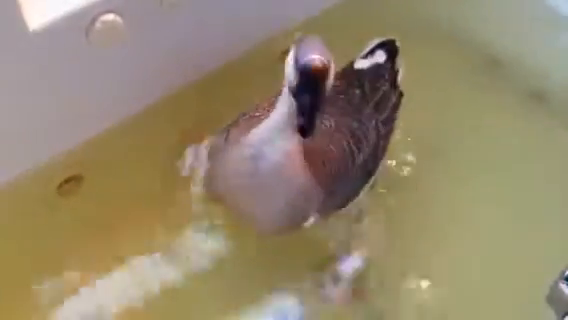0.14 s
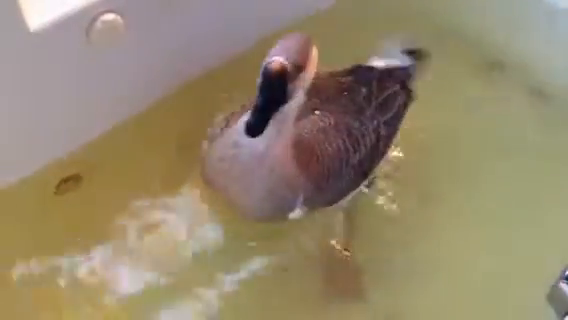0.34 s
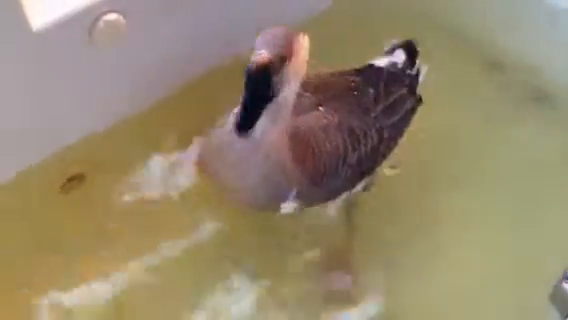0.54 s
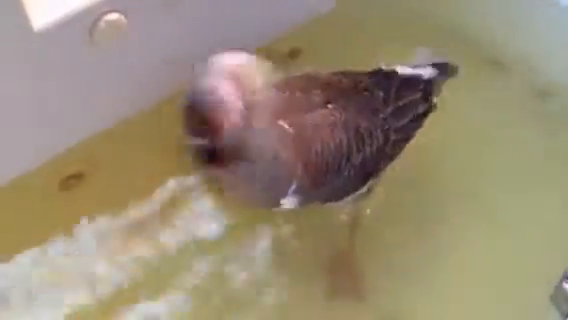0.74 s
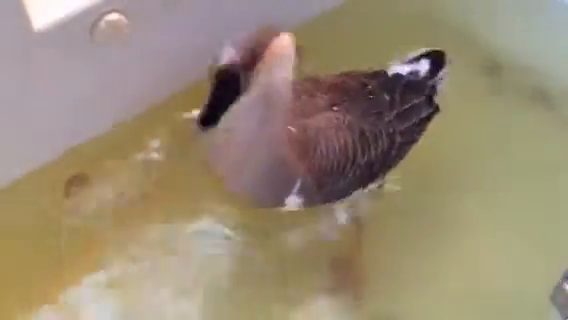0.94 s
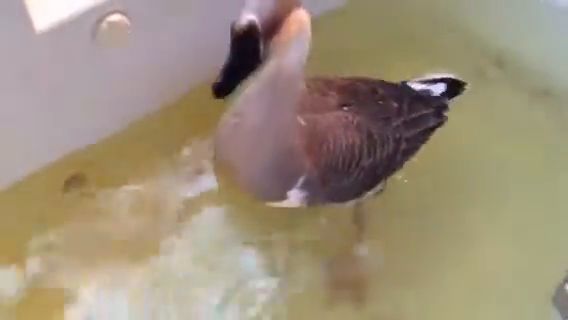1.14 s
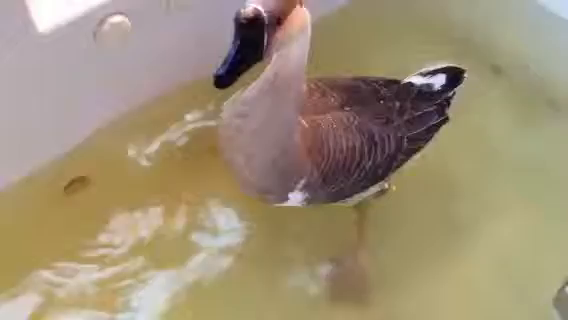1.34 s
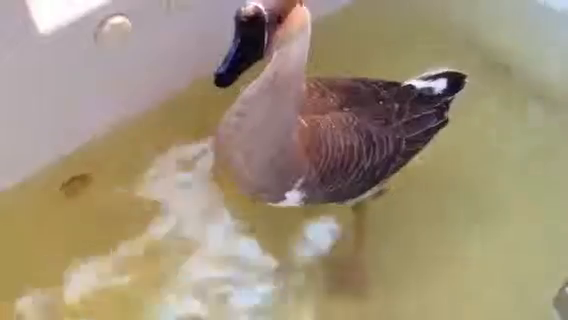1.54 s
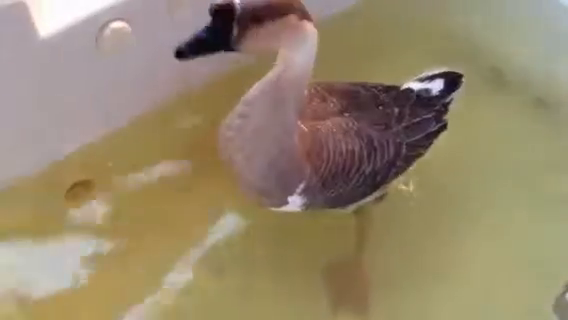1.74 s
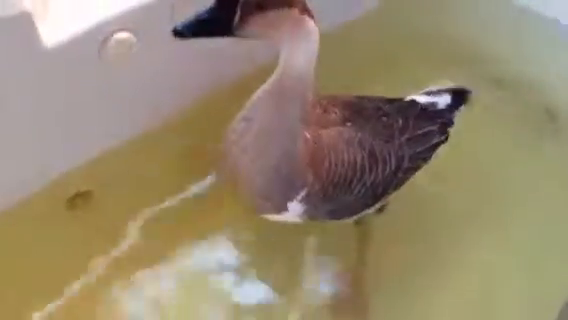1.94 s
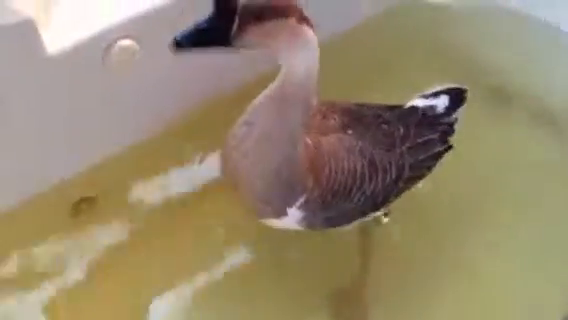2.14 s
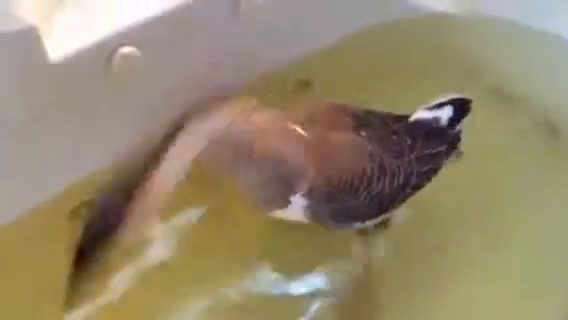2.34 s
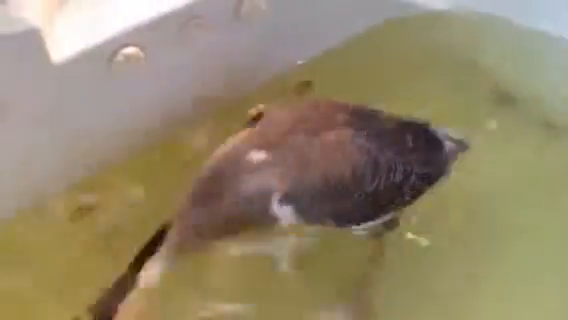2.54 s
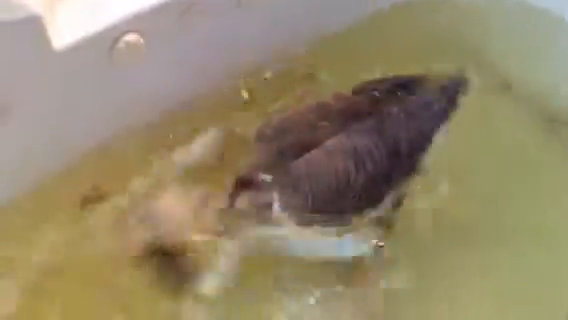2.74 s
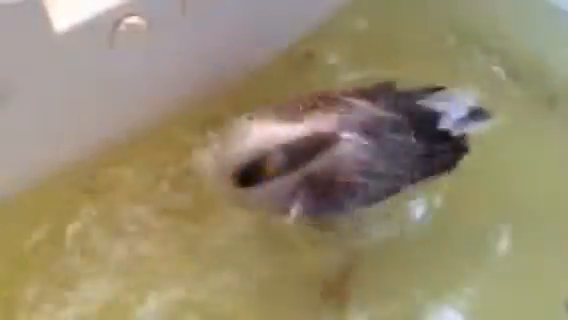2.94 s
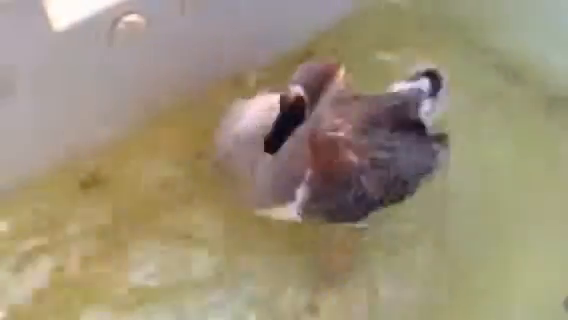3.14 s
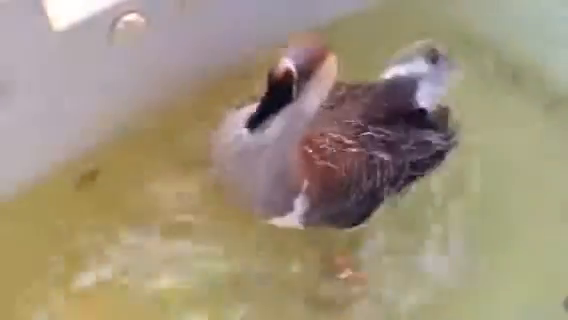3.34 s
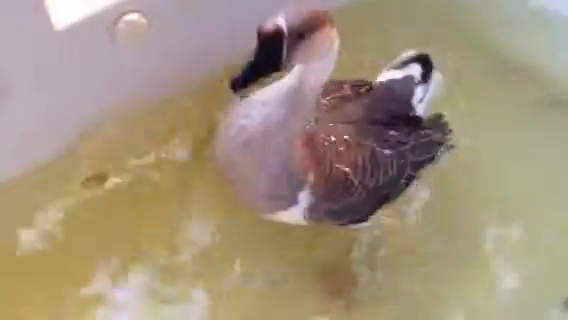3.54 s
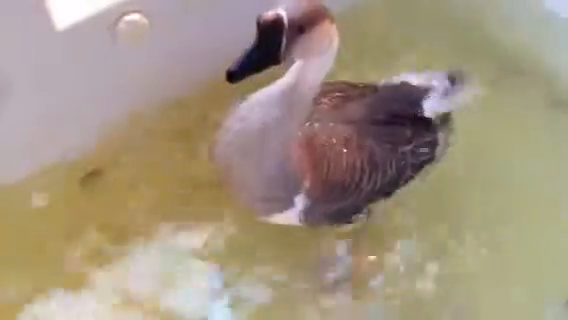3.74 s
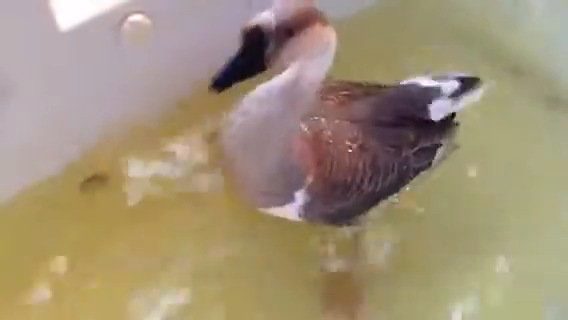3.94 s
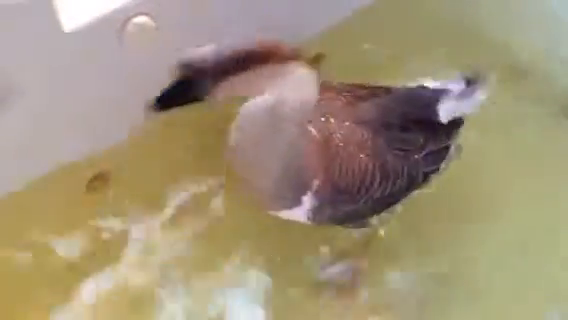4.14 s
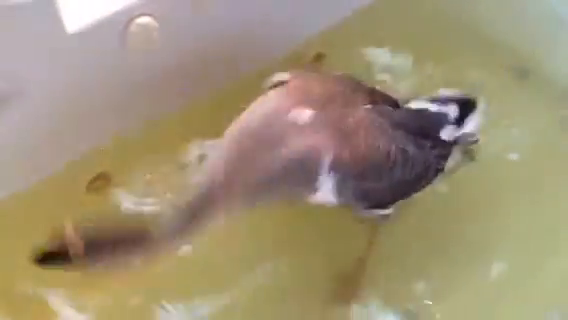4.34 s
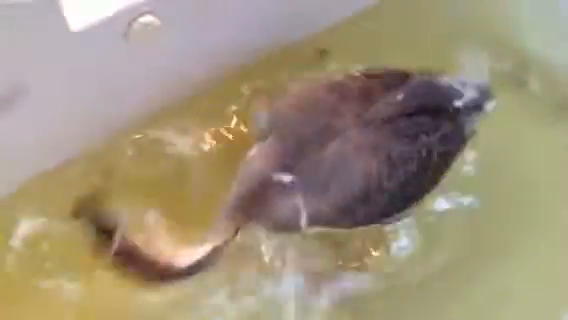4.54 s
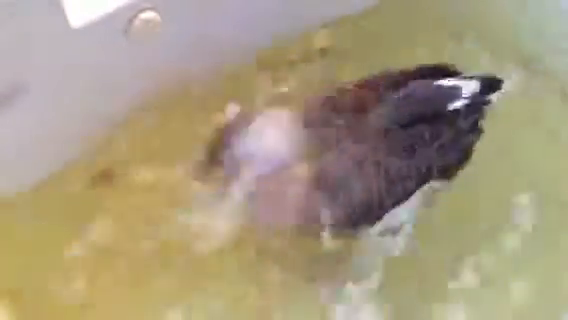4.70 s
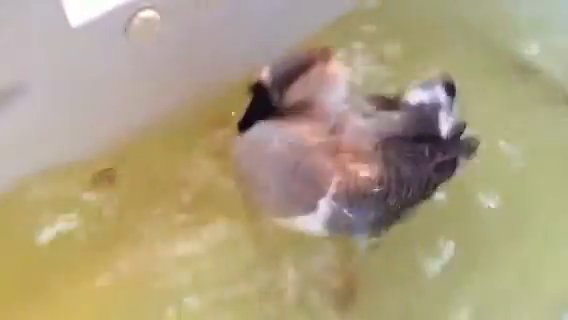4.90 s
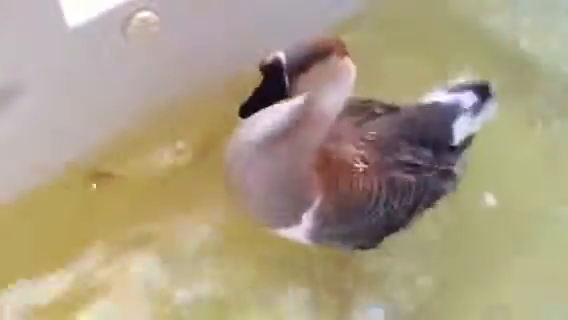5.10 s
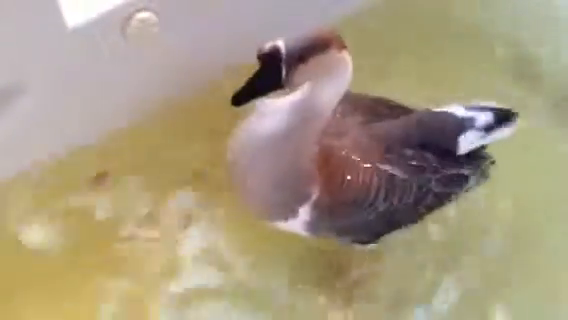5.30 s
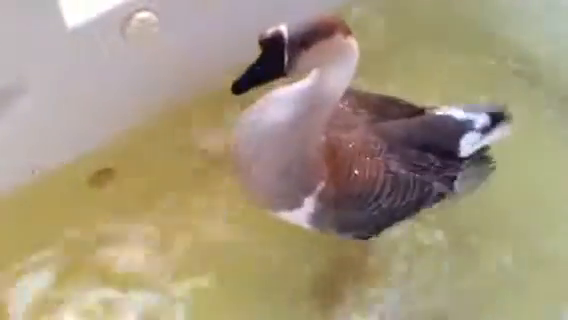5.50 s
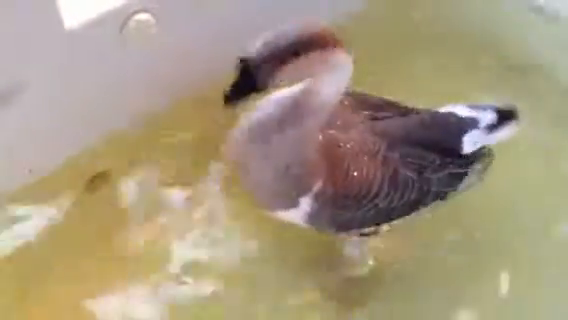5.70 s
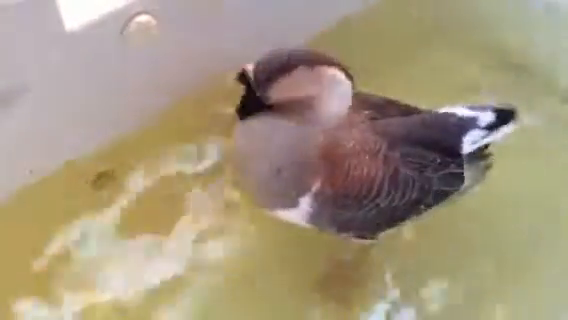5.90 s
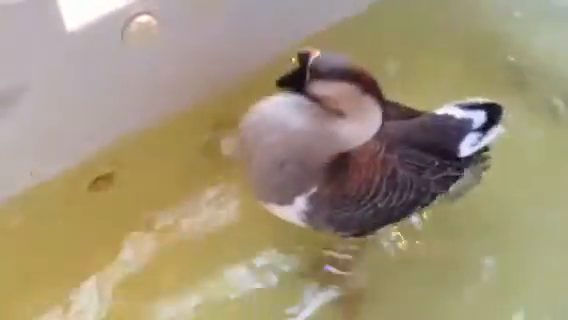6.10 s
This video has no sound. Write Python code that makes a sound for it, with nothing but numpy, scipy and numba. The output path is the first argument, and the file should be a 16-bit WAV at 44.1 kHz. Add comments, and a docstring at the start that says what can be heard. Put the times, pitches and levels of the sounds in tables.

```python
"""A goose bathes in a bathtub, heard from a phone held above it. First come a faint airy whistle, a light
stir of the water and, at 0.9 s, a shake of the head that flings spray. After more whistles near 2 s the
neck dips at 2.5 s and again at 4.4 s, each time churning up bubbles that ring as tiny resonators: swarms
fizz, large bubbles plop and glide, slaps knock the tub. The last drops tick on the water at 6 s.
Throughout, tub and tiles reverberate briefly over the hush of the room and the hiss of the microphone."""
import sys
import numpy as np
from scipy import signal
from scipy.fft import rfft, irfft
from scipy.io import wavfile
from numba import njit

SR = 44100
rng = np.random.default_rng(int(sys.argv[2]) if len(sys.argv) > 2 else 0)


def int16_out(signal):
    """Quantize to a 16-bit WAV file."""
    q = np.round(np.clip(np.atleast_2d(signal).T, -1, 1) * 32767)
    wavfile.write(sys.argv[1], SR, q.astype(np.int16))


N = 276066


def churn():
    """Air entrainment: the harder the bird stirs, the louder the swarms of resonating bubbles."""
    # spells of movement, one curve each: (t/s, fizz level/dB)
    spells = [
        [(0.4, -65), (0.48, -61), (0.56, -65), (0.7, -72.5), (0.79, -61.5), (0.97, -66.5), (1.08, -77)],
        [(2.073, -58.5), (2.15, -73), (2.4, -83)],
        [(2.485, -42.5), (2.59, -47.5), (2.64, -60), (2.665, -36), (2.81, -33.5), (2.835, -30.5), (2.92, -23.5),
         (2.96, -36), (3.09, -28.5), (3.17, -35), (3.29, -34), (3.36, -52.5), (3.47, -55), (3.7, -67)],
        [(4.33, -56.5), (4.43, -64.5), (4.45, -48), (4.6, -54.5), (4.64, -34.5), (4.79, -28.5), (4.835, -37.5),
         (4.87, -32), (5.0, -31.5), (5.08, -33.5), (5.13, -40.5), (5.28, -50.5), (5.5, -64), (5.54, -56.5),
         (5.62, -72.5), (5.8, -69)],
    ]
    # bill or neck drags air under: (t/s, gurgle level/dB)
    plunges = [(.5, -57), (.88, -48.5), (2.492, -26.5), (2.84, -22.5), (4.45, -35)]
    t, silent_db = np.arange(N) / SR, -150.
    fizz_db = np.full(N, silent_db)
    for spell in spells:
        times, db = np.transpose(spell)
        moving = (t >= times[0]) & (t <= times[-1])
        fizz_db[moving] = np.interp(t[moving], times, db)
    stir_db = fizz_db + 30  # 0 dB at full stir
    burst = lambda start, db, db_per_s: np.where(t >= start, db - db_per_s * (t - start), silent_db)
    plunges_db = [burst(start, db, db_per_s=207) for start, db in plunges]
    head_shake_db = burst(start=.889, db=-46, db_per_s=130)
    gurgle_db = np.max([-37 + 1.6 * stir_db] + plunges_db, axis=0)
    spray_db = np.maximum(-35 + .82 * stir_db, head_shake_db)
    spatter_db = flutter_db(per_s=30, spread_db=3.42)  # the water breaks unevenly
    fizz = swarm(fizz_db + spatter_db - 1, per_s=2206, band_hz=(988.5, 4304), cycles=13)
    gurgle = swarm(gurgle_db - 4, per_s=327, band_hz=(230.5, 1306.5), cycles=9.5, scatter_db=-3)
    spray = swarm(spray_db + spatter_db + 1.5, per_s=3001.5, band_hz=(3595.5, 13500), cycles=4,
                  scatter_db=3, db_per_octave=-4)
    trickle = swarm(-48 + .63 * stir_db, per_s=40, band_hz=(1303, 6997), cycles=34)
    return fizz + gurgle + spray + trickle


def swarm(db, per_s, band_hz, cycles, scatter_db=2.5, db_per_octave=5):
    """Incoherent sum: random bubbles add in power; each rises in pitch as it nears the surface."""
    when, pitch, strength, ringing = rng.random((int(per_s * N / SR), 4)).T
    t = when * N / SR
    low_hz, high_hz = band_hz
    hz = low_hz * (high_hz / low_hz) ** pitch
    t60 = cycles * (.5 + 2 * ringing) / hz
    scatter = -np.log(1 - strength + strength / 200)  # truncated exponential distribution
    size = undb(db_per_octave * np.log2(hz / low_hz) + scatter_db * scatter)
    expected_rms = np.sqrt(per_s * np.mean(size ** 2 * t60) / (4 * np.log(1000)))
    envelope = undb(np.interp(t, np.arange(N) / SR, db))
    return resonances(t, hz, t60, size * envelope / expected_rms, glide=.27 / t60)


def large_bubbles():
    """Bubble resonance: each is born in a splash, beats with a neighbour and flutters under ripples."""
    # bubbles that stand out: (t/s, level/dB, f/Hz, t60/s, glide/(octaves/s))
    plops = [(0.49, -41, 520, 0.066, -0.5), (0.65, -40.5, 328, 0.052, -2), (0.757, -30.5, 253, 0.028, 1),
             (2.505, -17, 453, 0.016, 4), (2.682, -41.5, 544, 0.23, 3.5), (2.744, -37, 1103, 0.13, -11),
             (2.835, -23.5, 2076, 0.071, -7.5), (2.862, -24, 2660, 0.045, 0), (2.903, -19, 917, 0.027, 7),
             (2.921, -30.5, 2340, 0.16, -4.5), (2.976, -25.5, 1525, 0.057, 0),
             (3.095, -18.5, 754, 0.023, 4.5), (3.096, -22, 1420, 0.024, -4), (3.234, -22, 1334, 0.034, -10),
             (3.305, -35.5, 1842, 0.15, 3), (3.307, -32.5, 989, 0.082, -3.5), (3.476, -31, 2114, 0.044, -3),
             (3.377, -45.5, 2510, 0.085, -2), (3.505, -26, 2890, 0.012, 5), (3.792, -40, 1563, 0.09, 0.5),
             (4.333, -48, 1630, 0.21, 30), (4.375, -35.5, 2554, 0.04, 12),
             (4.403, -45.5, 309.5, 0.48, 14.5), (4.44, -19, 320, 0.032, 2), (4.614, -33, 2450, 0.21, 5.5),
             (4.628, -21, 1163, 0.064, 8.5), (4.675, -24, 1924, 0.12, 8), (4.676, -23, 1240, 0.056, 19),
             (4.695, -19, 834, 0.021, -10.5), (4.86, -39, 640, 0.43, -6), (4.972, -32, 1240, 0.051, -1),
             (4.966, -33, 486.3, 0.26, 5), (5.003, -23.5, 555, 0.073, -0.5), (5.048, -27, 633, 0.1, 13),
             (5.1, -24.5, 618, 0.1, 6), (5.106, -25, 890, 0.091, 4.5), (5.115, -22.5, 1976, 0.036, 11),
             (5.311, -49, 760, 0.077, 4.5), (5.328, -41.5, 2070, 0.032, -6.5), (5.378, -43, 1540, 0.07, -2),
             (5.563, -48.5, 1590, 0.046, 1)]
    t, db, hz, t60, glide = np.transpose(plops)
    detune, lag = rng.uniform(-1, 1, (len(t), 2)).T
    tone = resonances(t, hz, t60, undb(db), glide)
    neighbour = resonances(t + .012 * abs(lag), hz * (1 + .1 * detune), t60, undb(db - 5), glide / 2)
    ripples = undb(flutter_db(per_s=70, spread_db=2.5))
    return (tone + neighbour) * ripples + splash(t, db - 7.5, hz, snap_db=-20, octaves=.5, count=30)


def slaps():
    """Impact excitation: a slap froths over many bubble sizes and rings the modes of tub and water."""
    # slaps of bill, neck or flung water: (t/s, level/dB, centre f/Hz, relative knock level/dB)
    impacts = [(0.4892, -33.5, 2900, -14.5), (0.612, -37.5, 2410, 0.5), (0.8019, -37.5, 5140, -28),
               (0.887, -32, 8640, -33), (0.9308, -33, 4460, -31), (1.024, -45.5, 2850, -29),
               (1.4447, -46.5, 1670, -19), (2.4884, -23, 1930, -8.5), (2.56, -40, 6500, -21),
               (2.596, -29, 5530, -20), (2.833, -25.5, 1880, -24), (3.7892, -39.5, 2670, -43),
               (3.9992, -47, 2780, -20), (4.4396, -17.5, 2670, -18), (4.362, -41.5, 1300, -20),
               (4.6173, -46, 2570, -25), (4.675, -34, 1910, -7), (4.9878, -17, 2370, -31),
               (5.418, -38.5, 4550, -31), (5.536, -39.5, 2180, -19)]
    # modes of tub and water: (f/Hz, level re knock/dB, t60/s)
    modes = [(141, 7, 0.04), (1124, -7.5, 0.019)]
    t, db, hz, knock_db = np.transpose(impacts)
    knock = sum(resonances(t, f, t60, undb(db + knock_db + mode_db)) for f, mode_db, t60 in modes)
    return knock + splash(t, db, hz, snap_db=-14, octaves=.856)


def drops():
    """Drop impact: each traps a tiny bubble that rings for 39 cycles, with a splash near its pitch."""
    # drops on the surface: (t/s, level/dB, f/Hz)
    drips = [(0.4804, -36.5, 3550), (0.5854, -44, 5000), (0.615, -36.5, 2880), (0.738, -51.5, 2670),
             (2.0752, -38, 3900), (2.084, -41, 4080), (2.59, -35, 3200), (2.6895, -18.5, 3470),
             (2.912, -20, 3500), (2.924, -19, 8400), (3.15, -28.5, 8500), (3.601, -49, 4800),
             (3.7496, -33, 4820), (3.8216, -39.5, 3160), (4.298, -53, 3430), (4.5198, -28, 4700),
             (4.576, -32, 4720), (4.6463, -19, 4230), (4.7534, -25, 3600), (4.7786, -21, 2400),
             (4.8599, -17.5, 5050), (4.907, -24.5, 7700), (4.957, -25.5, 3600), (5.0383, -21.5, 4340),
             (5.144, -29.5, 2850), (5.225, -49, 3400), (5.273, -42, 3150), (5.3107, -31, 7000),
             (5.374, -41, 3500), (5.4594, -42.5, 5850), (5.4992, -42.5, 4270), (5.6174, -42, 11600),
             (5.6365, -45, 4530), (5.7221, -46.5, 6200), (6.0047, -36.5, 3400), (6.0405, -32.5, 3650)]
    t, db, hz = np.transpose(drips)
    return resonances(t, hz, 39 / hz, undb(db)) + splash(t, db, hz, snap_db=-29, octaves=.19)


def splash(t, db, hz, snap_db, octaves, count=80):
    """Broadband transient: a click, a snap of bright noise and dying froth spread around a pitch."""
    snap_t60, froth_t60 = .064, .075  # s
    kicks = np.zeros(N)
    kicks[(t * SR).astype(int)] = undb(db + snap_db + 8 * np.log2(hz / 3000))  # finer is brighter
    decay = signal.lfilter([1], [1, -undb(-60 / (snap_t60 * SR))], kicks)
    snap = decay * highpass(rng.standard_normal(N), hz=5000, order=2)
    age = rng.random((len(t), count)).T ** 2 / 2  # share of the froth's t60
    froth_t = (t + age * froth_t60).ravel()
    froth_size = undb(db - 13.5 - 60 * age).ravel()
    froth_hz = np.clip(hz * 2 ** (octaves * rng.standard_normal((len(t), count)).T), 300, 15000).ravel()
    bubble_t60 = np.minimum(46 / froth_hz, .023)  # large bubbles in froth break up early
    froth = resonances(froth_t, froth_hz, bubble_t60, froth_size)
    click = resonances(t, hz, t60=9 / hz, size=undb(db - 2))
    return snap + froth + click


def resonances(t, hz, t60, size, glide=0.):
    """Superposition of damped oscillators struck at times t/s; glide is in octaves/s."""
    each = np.ones(len(t))
    return ring((t * SR).astype(np.int64), hz * each, t60 * each, size, glide * each)


@njit
def ring(start, hz, t60, size, glide):
    """Damped oscillation: each sine swells briefly, glides a limited way and stops 50 dB down."""
    rise_cycles, reach_octaves = 1.2, .45
    out = np.zeros(N)
    for k in range(len(start)):
        phasor, onset_gap = size[k] + 0j, 1.
        swell = np.exp(-hz[k] / (rise_cycles * SR))
        step = np.exp(2j * np.pi * hz[k] / SR - np.log(1000) / (t60[k] * SR))
        bend = np.exp(2j * np.pi * hz[k] * np.log(2) * glide[k] / SR ** 2)
        for i in range(start[k], min(N, start[k] + int(.83 * t60[k] * SR))):
            onset_gap *= swell
            out[i] += phasor.imag * (1 - onset_gap)
            phasor *= step
            if (i - start[k]) * abs(glide[k]) < reach_octaves * SR:
                step *= bend
    return out


def whistles():
    """Narrow-band noise that swells and fades, perhaps air in the bird's nostrils."""
    # airy whistles: (start t/s, end t/s, f/Hz, bandwidth/Hz, level/dB)
    breaths = [(0.288, 0.476, 4030, 200, -70), (0.293, 0.458, 2020, 60, -73), (2, 2.14, 1560, 90, -72.5),
               (2.076, 2.324, 3700, 250, -70.5)]
    out, t = np.zeros(N), np.arange(N) / SR
    for start, end, hz, width_hz, db in breaths:
        band = signal.lfilter(*signal.iirpeak(hz, hz / width_hz, SR), rng.standard_normal(N))
        progress = np.clip((t - start) / (end - start), 0, 1)
        out += level(band, db) * np.sin(np.pi * progress) ** .5
    return out


@njit
def reverberation(x, t60, damping):
    """Multiple reflection off tub and tiles: eight coupled delay lines, duller on every round."""
    lags = np.array([211, 337, 461, 613, 797, 983, 1171, 1399])  # samples
    gain = 10 ** (-3 * lags / SR / t60)
    line, dulled, out = np.zeros((8, 2048)), np.zeros(8), np.zeros(N)
    for i in range(N):
        for k in range(8):
            dulled[k] += (1 - damping) * (gain[k] * line[k, (i - lags[k]) & 2047] - dulled[k])
            out[i] += dulled[k] * (1 - 2 * (k % 2))
        line[:, i & 2047] = x[i] + dulled - dulled.sum() / 4
    return out


def hush():
    """Stationary noise: room tone and microphone hiss."""
    # noise spectrum: (f/Hz, relative spectral level/dB)
    spectrum = [(20, -31), (85, -18.5), (120, -5), (270, -4.5), (1030, -16.5), (1120, -16), (1440, -18.5),
                (2080, -16), (2600, -13.5), (14300, -18), (16000, -22)]
    hz, db = np.transpose(spectrum)
    f = np.arange(N // 2 + 1) * SR / N + 1
    shape = undb(np.interp(np.log(f), np.log(hz), db))
    return level(irfft(rfft(rng.standard_normal(N)) * shape, N), db=-66.5)


def flutter_db(per_s, spread_db):
    """Random amplitude modulation: levels in dB joined by straight lines."""
    knots = rng.standard_normal(N // 100)
    return spread_db * np.interp(np.arange(N) * per_s / SR, np.arange(len(knots)), knots)


def highpass(x, hz, order):
    return signal.sosfilt(signal.butter(order, hz, "high", fs=SR, output="sos"), x)


def undb(db):
    return 10 ** (np.asarray(db) / 20)


def level(x, db):
    """Scale to an rms level."""
    return x * undb(db) / np.sqrt(np.mean(x ** 2))


def scene():
    """Superposition of direct sound, reverberation and background noise."""
    direct = churn() + large_bubbles() + drops() + slaps() + whistles()
    echo = undb(-17.5) * reverberation(direct + 1e-18, t60=.34, damping=.032)
    bath = highpass(direct + echo, hz=320, order=1)  # small bubbles radiate next to no bass
    return (bath + hush())[None]


def record(dry):
    """Band limiting: the phone cuts the treble above 15.5 kHz."""
    return signal.sosfilt(signal.ellip(10, .2, 60, 15500, fs=SR, output="sos"), dry)


dry = scene()
out = record(dry)
int16_out(out)
```